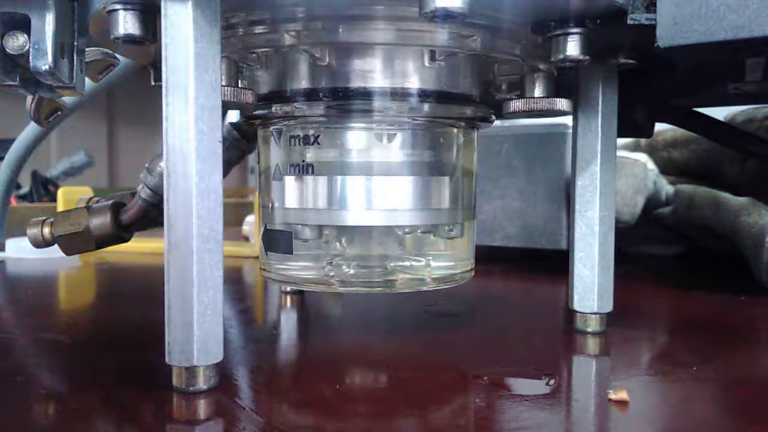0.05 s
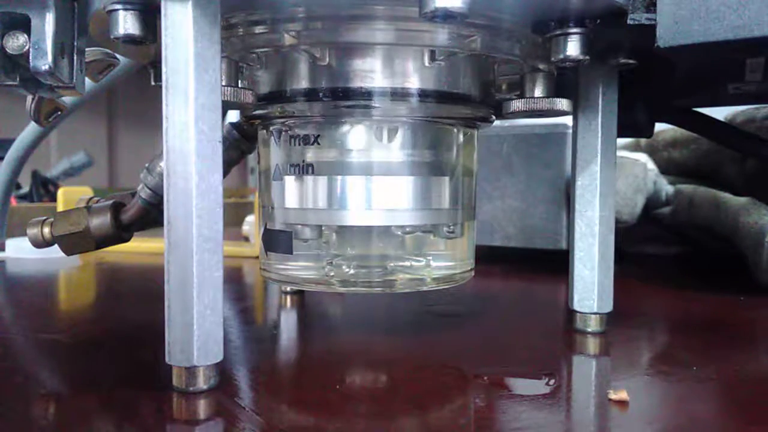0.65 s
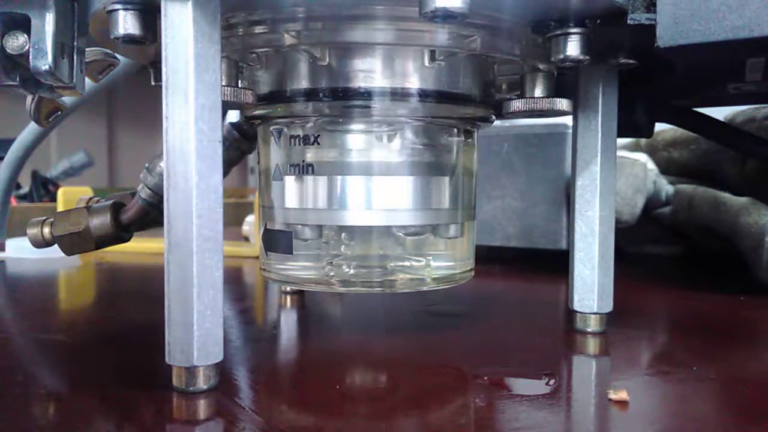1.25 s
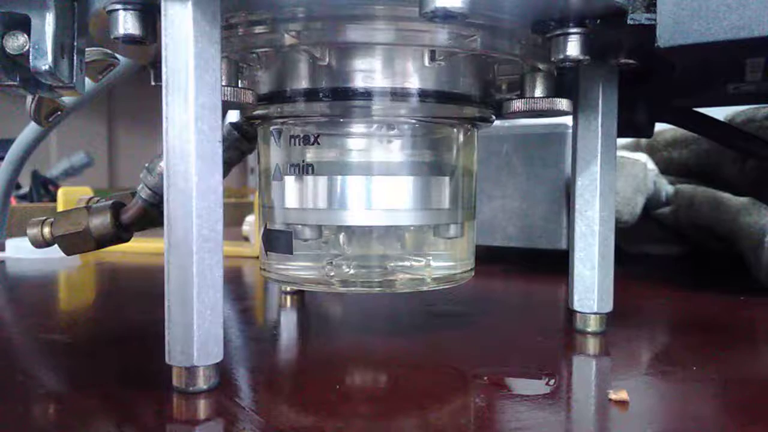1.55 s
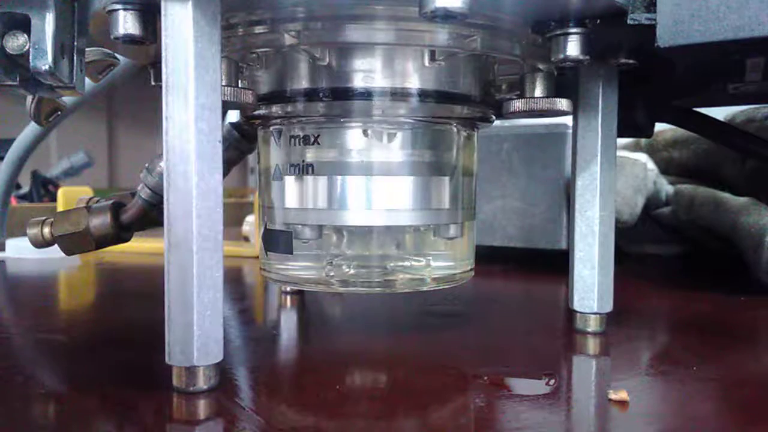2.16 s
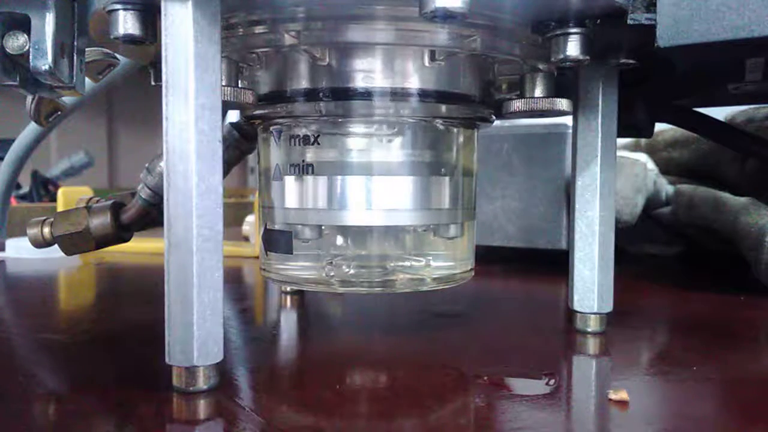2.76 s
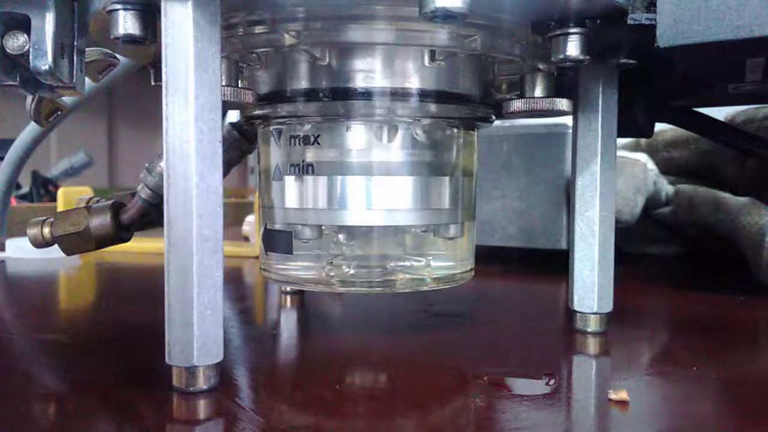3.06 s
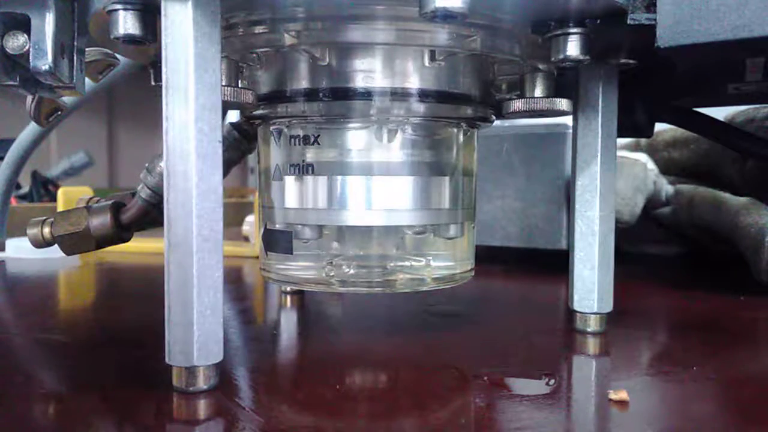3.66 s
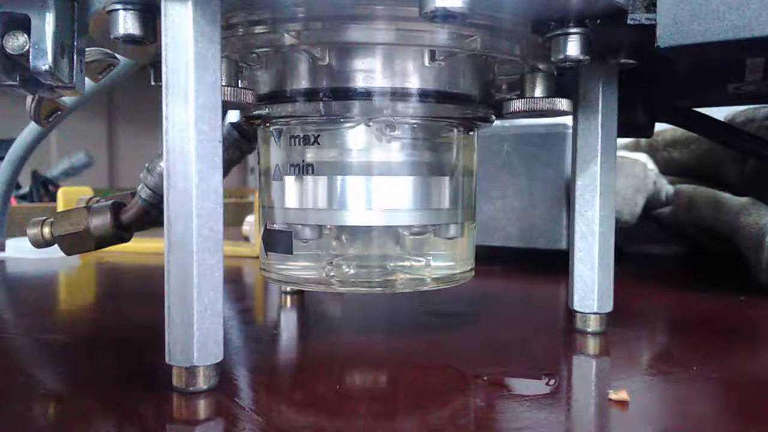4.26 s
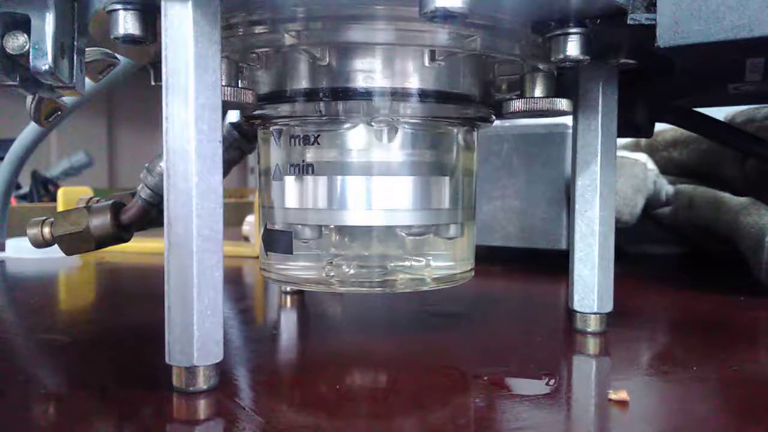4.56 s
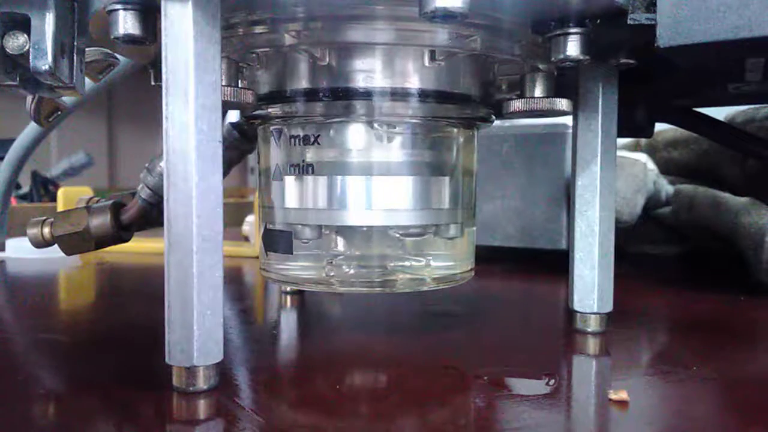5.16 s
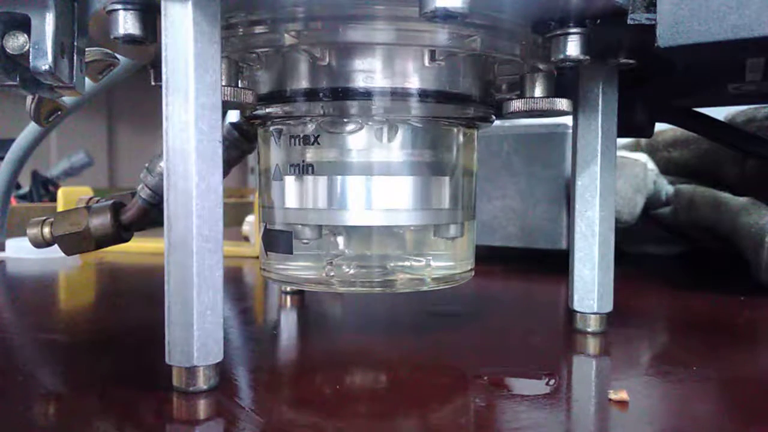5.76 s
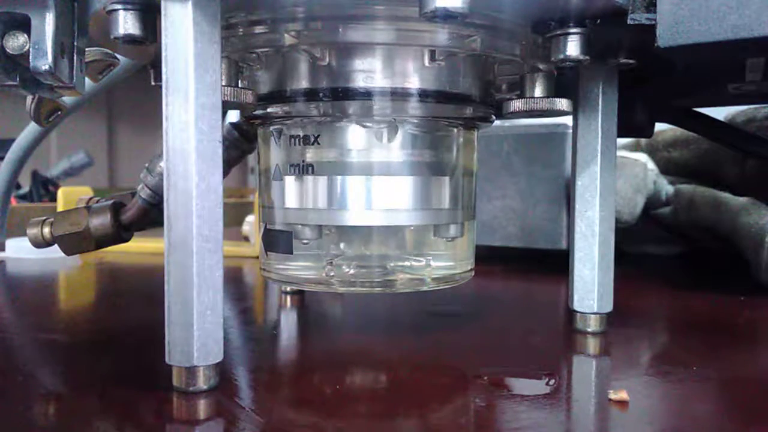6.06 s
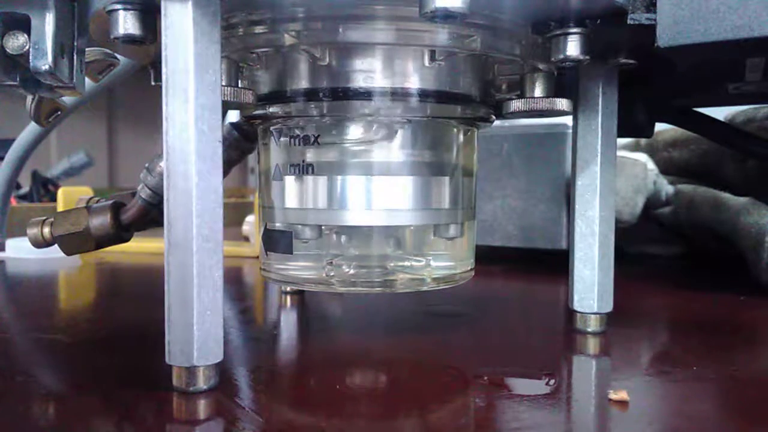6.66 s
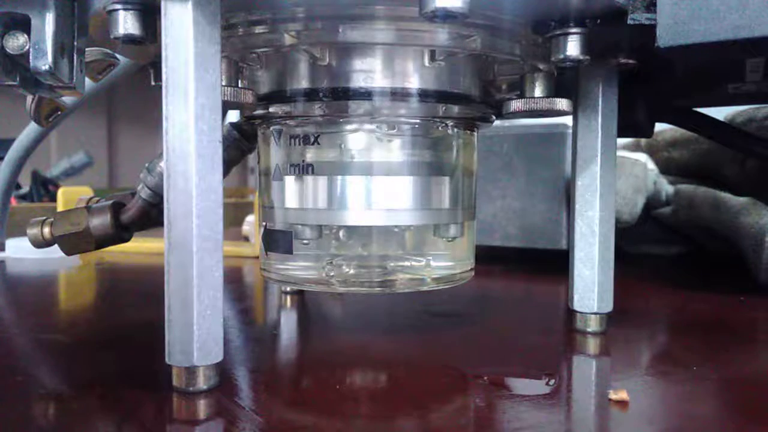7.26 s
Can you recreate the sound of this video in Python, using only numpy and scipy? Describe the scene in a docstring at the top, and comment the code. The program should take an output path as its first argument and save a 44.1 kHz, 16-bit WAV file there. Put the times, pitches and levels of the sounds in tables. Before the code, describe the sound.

High machine whines creep upward in pitch as a pump gathers speed, over a steady low hum and rushing air.

```python
"""A turbomolecular vacuum pump slowly gathers speed on a workshop bench, heard close up in stereo.
From the start, a cooling fan and the mains-driven backing pump hum over a steady rush of air, while the
unbalanced rotor sings one rising tone and its ball bearings add high whines and hiss that climb with it.
Just after 3 s the housing ticks faintly; soon the rotor tone sinks as it leaves the stand's resonances.
Near 6.5 s it crosses the fan's second harmonic, and the throb between the two slows to a halt."""
import sys
import numpy as np
from scipy import signal
from scipy.fft import rfft, irfft
from scipy.io import wavfile

SR = 44100
rng = np.random.default_rng(int(sys.argv[2]) if len(sys.argv) > 2 else 0)


def log_audio(samples):
    """Write samples as a 16-bit WAV file to the path given in sys.argv[1]."""
    # one column per channel
    frames = np.atleast_2d(samples).T
    # limit to full scale, then quantise
    limited = np.clip(frames, -1, 1)
    pcm = np.round(limited * 32767).astype(np.int16)
    wavfile.write(sys.argv[1], SR, pcm)


N = 322812
TIME = np.arange(N) / SR

START_HZ, SPIN_UP_HZ_PER_S = 402.77, 8.378  # steady torque, so the rotor gains speed evenly
UNBALANCE_LEFT_DB, UNBALANCE_RIGHT_DB = -36, -52.5  # rotor tone away from any resonance
BALL_TURNS, BALL_LAG_PER_S = 2.212, .003585  # ball turns per rotor turn, and their loss to slip
CAGE_TURNS = .424  # per rotor turn
FAN_HZ, FAN_SWELL_S = 228.7, 7.015  # blade rate; when its second harmonic swells with the rotor tone
FAN_LAG_S = .0003  # the fan stands to the right, so its rush reaches the left later
VANE_HZ = 47.6  # strokes of the backing pump
TOP_HZ = 14200

# The bed of cooling air. Each row: frequency in Hz, left and right level in dB per Hz.
AIR_SPECTRUM = [(25, -102, -100), (40, -87, -87), (64.6, -93, -75.5), (131, -77.5, -71), (280, -72, -76),
                (370, -75.5, -75.5), (523, -76.5, -77.5), (755, -80, -76), (880, -78, -72),
                (1190, -77, -71), (1185, -79.5, -74.5), (1750, -85, -84)]
# The fan's drone. Each row: multiple of the blade rate, left and right level in dB, left lead in radians.
FAN_HARMONICS = [(1, -51.7, -42.7, -.7), (2, -53, -49, -.5), (3, -64, -58.5, -1.5), (4, -54.4, -47.9, -1.5),
                 (5, -72, -61, -.4), (6, -71, -71, 3)]
# The backing pump's mains hum, motor tones and thin whistles.
# Each row: pitch in Hz, left and right level in dB, left lead in radians.
MAINS_TONES = [(100.1, -58.5, -46.0, -0.12), (200, -61, -56, 0.38), (299, -62, -52, -0.55),
               (405, -57.5, -69, 0.16), (603, -100, -81, -1)]
MOTOR_TONES = [(238.1, -63, -65, -.1), (523.6, -66, -73, .3), (571.3, -64.5, -72, .3),
               (619.1, -67.5, -65.5, 0), (645, -70, -69, 0), (785.6, -65, -58.5, 2.9),
               (809.5, -64.5, -61, 2.3), (833.1, -69.8, -62, -3.1), (857, -69, -66, 0), (862, -63, -62, .3),
               (885.55, -46.3, -48.6, 1.4), (1085.4, -64, -65, 1.8), (1095, -66, -80, .2)]
WHISTLE_TONES = [(7576, -68, -82, 0), (7670, -66, -82, -.4)]
# A faint tick. Each row: start in seconds, level in dB before the housing colours it.
TICK_CUES = [(3.183, -44)]
# The housing's ring. Each row: centre in Hz, width in Hz, gain in dB, seconds to die away by 60 dB.
HOUSING_MODES = [(2950, 700, 3.5, 0.056), (3900, 900, -4, .04)]
# The bearings' rolling hiss. Each row: frequency in Hz, left and right level in dB per Hz.
HISS_SPECTRUM = [(2404, -81.5, -80.5), (3180, -81.5, -83.5), (4570, -85, -88.5), (4700, -88.5, -91),
                 (6400, -93, -91), (7980, -85.5, -91), (9020, -78.5, -90.5), (10160, -84.5, -102),
                 (10730, -81, -96), (12200, -93.5, -89), (12960, -99, -88), (14300, -103, -100)]

# Level rides of the loud whines as they climb through the casing's resonances, named for their middle
# pitch in Hz. Each row: time in seconds, left and right level in dB, left lead in radians.
BALL_2860 = [(0.0, -49, -63.7, 0), (0.1, -57.7, -68.6, 2.6), (0.31, -74.4, -68.9, 4.3),
             (0.41, -61.5, -64.3, 3), (0.58, -68.7, -66.4, 7), (0.68, -60.8, -73.0, 4),
             (0.99, -58.3, -54.6, 4), (1.16, -72.4, -67.6, 6), (1.26, -64.7, -57.9, 4.4),
             (1.39, -67, -51.7, 5), (2.35, -45, -47.5, 1.5), (3.16, -51.7, -44, 0.6), (3.5, -52, -44, 0.6),
             (3.78, -60.7, -46, 1.6), (4.35, -50.1, -45.1, 1.4), (5.03, -51.1, -46.5, 1.3),
             (5.2, -60, -49.3, 1.5), (5.44, -49, -44.5, 1.0), (5.88, -51.9, -47.5, 0),
             (5.99, -60, -46.1, -0.4), (6.22, -50.8, -47, -1.0), (6.39, -49.4, -56.1, -4),
             (6.97, -49.5, -45, -5), (7.32, -52, -53, -5)]
BALL_3810 = [(0.0, -51, -48.5, -1.9), (0.51, -55.9, -49, -2), (1.02, -50, -45.5, -1.9),
             (1.16, -59, -57.1, -2.5), (1.33, -58.9, -51, -2.5), (1.63, -60.5, -55, -5),
             (2.07, -57.2, -54, -3.5), (2.28, -54.6, -49, -8), (3.03, -56.6, -56, -8.2),
             (3.3, -66.9, -63.9, -9), (3.81, -58.2, -59.8, -9.9), (3.95, -71.9, -58, -9),
             (4.05, -59.0, -56.1, -12.5), (4.29, -61, -63, -12.2), (4.46, -73.8, -58.0, -15),
             (4.56, -58.7, -58.5, -12), (4.69, -57.8, -58.1, -14.4), (5.2, -64, -54.1, -17.5),
             (6.19, -53.8, -55.6, -20.5), (6.36, -66, -50, -15), (6.53, -54.7, -57, -19),
             (6.87, -62.2, -49, -18.0), (7.04, -51, -52.2, -17.5), (7.32, -53.6, -51, -19)]
RACE_1120 = [(0, -71, -62, -1.5), (4.2, -70, -64, -1.5), (5.6, -61, -56, -1), (7.3, -61, -57.5, -1)]
RACE_1480 = [(0, -61, -59, -1.8), (1, -65, -58, -1.5), (1.6, -72, -71, -2), (4, -72, -69, -2),
             (4.7, -62, -61, -2), (7.3, -71, -68, -2)]
RACE_1900 = [(0, -70, -66, -3), (1, -66, -59, -2.5), (2.4, -63, -56, -2.5), (3.1, -73, -70, -3),
             (4, -74, -68, -3), (4.6, -64, -62, -3), (7.3, -62, -56, -3)]
RACE_2350 = [(0.0, -64.1, -53, 1.9), (0.88, -67.1, -50, 2.0), (1.63, -56, -57, 1.7),
             (2.01, -60.4, -50.8, 1.5), (2.38, -53, -53, 2.5), (3.27, -61, -60, 1.9),
             (3.84, -51.5, -62, 1.4), (4.25, -54.6, -69, 3.2), (5.44, -61, -51.5, 5.2),
             (6.19, -53.1, -54, 5.8), (6.53, -55.9, -55.9, 5.2), (7.32, -53.5, -51, 4.8)]
RACE_2830 = [(0.0, -55, -51.5, 2.7), (1.38, -66, -56, -3.5), (2.22, -61.8, -57, 0.5),
             (3.06, -62.4, -65.5, 1), (3.55, -57, -59, 1), (3.75, -68, -69, 0), (5.03, -57, -61, 1),
             (6.66, -58, -62, -4), (7.3, -56, -57, 1.5)]
RACE_3150 = [(0.0, -62.0, -64.6, 0.9), (0.65, -74.2, -69.5, -1), (1.12, -57.1, -58.7, 0.2),
             (1.7, -54, -64.6, 1), (2.76, -52.5, -56.0, -1.7), (3.47, -59.2, -56, -2.5),
             (3.67, -68.2, -68.4, -1.7), (4.15, -73.1, -61.3, -2), (5.61, -68.2, -61.8, -1.9),
             (6.05, -66, -66.2, -3.8), (6.43, -67.2, -69.1, -2), (6.7, -71.7, -65.5, 0),
             (7.32, -65.6, -68.5, -7)]
RACE_3400 = [(0.0, -46, -45, -0.5), (0.24, -46.3, -51, -2), (0.58, -53.1, -50, -1.0), (0.78, -45, -48, 0.9),
             (0.95, -46, -55, -2), (1.22, -56, -46.5, -1.8), (1.56, -50, -49.5, 0.8), (1.9, -51, -48, -3),
             (2.07, -52.4, -47, -1), (2.35, -46, -46.5, -0.6), (2.59, -50.1, -43.5, -1.5),
             (3.06, -47, -44.5, 0.5), (3.3, -49, -49, -1.5), (3.61, -54.4, -45.5, -0.6),
             (4.08, -51, -48.5, 1), (4.73, -48, -48.5, -1.5), (5.07, -60, -47.5, -2),
             (5.37, -48, -53, -0.5), (5.61, -44, -51.9, -2.4), (5.85, -58, -46, -2),
             (6.12, -47.3, -49.2, -1.3), (6.43, -51.6, -49.0, -0.9), (7.21, -51, -54.6, -2.0),
             (7.32, -54.0, -55.5, -2)]
RACE_4260 = [(0.0, -57.8, -68.4, -0.7), (0.41, -58, -56, 2.5), (0.68, -48, -58, -1.5),
             (0.88, -61.7, -51, -2.9), (1.36, -55.0, -59, -5.5), (1.87, -61.8, -53, -6.4),
             (2.07, -56.1, -58.7, -6.0), (2.24, -63.8, -55, -5.2), (2.65, -60, -62, -0.5),
             (2.89, -51, -59, -1), (3.16, -61, -52, -1.5), (3.78, -58, -56, -1), (4.12, -68, -50.5, -4),
             (4.42, -52, -53, -5), (5.03, -63.4, -48.5, -4), (5.41, -52, -49.1, -4.7),
             (6.29, -57, -55, -5.5), (6.67, -66.3, -62, -6.2), (6.73, -68.1, -58, -3.9),
             (7.32, -63.3, -57.4, -7)]
RACE_6180 = [(0, -77, -68, .8), (3.3, -71, -66, .8), (5, -63, -63.5, 1), (7.3, -66, -60, .8)]
RACE_11050 = [(0.0, -62, -67.8, -2.1), (0.48, -50.3, -65.5, -1.5), (0.85, -52, -70.8, -1.5),
              (1.43, -54, -60.6, -2.5), (1.87, -52.1, -66.9, -4), (2.69, -57.7, -61.7, -1),
              (3.16, -49, -61.7, -2), (3.47, -55, -64.6, -2), (4.08, -52, -55, -1.1),
              (4.76, -49, -60.7, -1), (4.93, -51.5, -68.8, 2), (5.27, -52, -68.6, -3),
              (5.58, -49.6, -58, -1.4), (5.88, -51, -69.2, -1.6), (6.09, -49, -64.6, -3.5),
              (6.53, -57.7, -57, -1.5), (6.84, -52, -73.3, -2.7), (7.32, -63.9, -56.0, 1)]
RACE_12950 = [(0.0, -59.2, -61, -1), (0.78, -66.8, -47, -2), (1.8, -62.7, -53, 1.5),
              (2.01, -59.1, -50.9, -0.7), (2.65, -62.2, -54.1, -0.8), (2.99, -57, -49, -1.3),
              (3.74, -66.1, -49.4, -1.9), (3.91, -61.4, -54.5, -2.5), (4.18, -71.1, -57.3, -2),
              (4.52, -65.0, -58, -5.8), (4.73, -73.3, -55.1, -4), (4.93, -62.8, -59, -7.8),
              (5.58, -69.2, -53.2, -8.7), (6.84, -61.9, -56, -6), (7.14, -71.7, -56.2, -9),
              (7.32, -66.6, -58.5, -6.7)]
# Loud ball whines. Each row: multiple of the ball spin, level ride.
BALL_LOUD = [(3, BALL_2860), (4, BALL_3810)]
# Faint ball whines. Each row: multiple of the spin, left and right level in dB, left lead in radians.
BALL_FAINT = [(2, -66, -63, 3.5), (5, -64, -67, -2.5), (7, -62.5, -68, 2), (8, -82, -76, 0),
              (9, -72, -95, -5.5), (10, -64, -79, 0)]
# Loud raceway whines, each throbbing against a close twin from the other bearing.
# Each row: multiple of the rotor speed, cage gaps up to the twin, time of one swell in seconds,
# the twin's relative level in dB, how far it follows the load from 0 to 1, level ride.
RACE_LOUD = [(2.57, 1, .058, -12, 0, RACE_1120), (3.423, 1, .058, -9, 0, RACE_1480),
             (4.423, 1, .058, -7, 0, RACE_1900), (5.424, 1, .058, -5, 0, RACE_2350),
             (6.521, 2, .104, -2, 0, RACE_2830), (7.275, -3, .097, -11, 0, RACE_3150),
             (7.834, 2, .104, 0, 1, RACE_3400), (9.834, 2, .076, -15, 0, RACE_4260),
             (14.25, 3, 0, -12, 0, RACE_6180), (25.5, 1, .25, -14, 0, RACE_11050),
             (29.914, 1, 0, -20, 0, RACE_12950)]
# Faint rotor, raceway and cage whines.
# Each row: multiple of the rotor speed, left and right level in dB, left lead in radians.
RACE_FAINT = [(3, -74, -73, -2.3), (3.81, -73, -71, -1), (4, -80, -71, -3.1), (5.168, -75, -67, 2.1),
              (6.355, -78, -70, 0.3), (6.423, -71, -67, 0.3), (6.905, -68, -70, -2.6),
              (7.75, -71, -71, -1.8), (8.841, -66, -68, -1.5), (9.964, -71, -67, -3.0),
              (9.991, -72, -67, 2.0), (10.33, -76, -75, 0), (10.7, -73, -69, 0.4), (13.8, -76, -76, 0),
              (16.664, -74, -72, 2.2), (17.586, -73, -71, -0.7), (20.291, -73, -73, -2.6),
              (21.914, -67, -76, -1.8), (23.109, -70, -76, -3.1), (24.095, -69, -83, 1.8),
              (27.241, -74, -71, -0.9), (27.5, -69, -64, -2.9), (27.918, -77, -70, -2.9),
              (30.618, -75, -66, -1.5), (30.705, -81, -71, -1.2), (30.959, -78, -72, 2.9),
              (31.355, -77, -68, -0.5), (31.909, -78, -71, 0.1), (34.345, -71, -63, -1.0)]
# The two cages' rates, slowly drawing together. Each row: time in seconds, gap between them in Hz.
CAGE_GAP = [(0, 2.98), (.5, 3.02), (3.25, 3.05), (4.5, 2.8), (5.45, 2.63), (6.35, 2.9), (7.3, 2.6)]
# The second bearing's shifting share of the load, which makes the throb come and go.
# Each row: time in seconds, the twin's left and right gain in dB.
TWIN_LOAD = [(0, -3, -2.5), (1.1, -6, -4.5), (1.8, -4, -2), (2.3, -13, -10), (3.1, -10, -9), (4, -1, -2.5),
             (4.9, -3, -.5), (5.7, -9, -8), (6.6, -7, -11), (7.3, -2, -8)]
# Resonances of the pump on its legs. Each row: centre in Hz, width in Hz, left and right lift in dB.
STAND_MODES = [(407.3, 20.4, 2.5, 10.5), (420.3, 17.6, 4.5, 7.5), (433.5, 16, 2, 10.5)]


def undb(db):
    """Decibels to gain."""
    return 10 ** (np.asarray(db) / 20)


def curves(table):
    """One automation curve for each column after a table's time column."""
    times, *columns = np.transpose(table)
    return [np.interp(TIME, times, column) for column in columns]


def walk(rate):
    """Smooth random drift with a spread of 1, changing about rate times a second."""
    knots = rng.standard_normal(int(N / SR * rate) + 2)
    fine = signal.resample_poly(knots, up=8, down=1)
    return np.interp(TIME * rate * 8, np.arange(len(fine)), fine)


def angle(hz):
    """Running angle of something that turns hz times a second, from a random start."""
    return rng.uniform(0, 2 * np.pi) + 2 * np.pi * np.cumsum(hz * np.ones(N)) / SR


def tone(phase, left_db, right_db, lead):
    """One stereo partial at RMS levels, the left side ahead by lead radians."""
    phase = np.mod(phase, 2 * np.pi).astype(np.float32)
    left = undb(left_db) * np.sin(phase + np.float32(lead))
    right = undb(right_db) * np.sin(phase)
    return np.array([left, right]) * np.sqrt(2)


def stereo_noise(likeness):
    """White noise, wide at likeness 0 and mono at 1."""
    shared = np.sqrt(likeness) * rng.standard_normal(N)
    return shared + np.sqrt(1 - likeness) * rng.standard_normal((2, N))


def colour(noise, spectrum, skirt_db):
    """EQ each side of a noise, rolling off by skirt_db an octave beyond the spectrum's ends."""
    hz, *sides = np.transpose(spectrum)
    octave, points = np.log2(np.maximum(np.fft.rfftfreq(N, 1 / SR), 1)), np.log2(hz)
    outside = np.abs(octave - np.clip(octave, points[0], points[-1]))
    db = np.array([np.interp(octave, points, side) for side in sides]) - skirt_db * outside
    return irfft(rfft(noise) * undb(db), N) * np.sqrt(SR / 2)


def air_rush():
    """The fan pushes an even bed of air, much alike on both sides but later on the left."""
    rush = colour(stereo_noise(likeness=0.57), AIR_SPECTRUM, skirt_db=23.0)
    left, right = rush * undb(0.45 * walk(rate=8))
    return np.array([np.roll(left, round(FAN_LAG_S * SR)), right])


def fan_blades(rotor_angle, waver_db=0.4):
    """The blades drone on harmonics of one steady rate; the second throbs against the rotor tone."""
    swell_angle = np.interp(FAN_SWELL_S, TIME, rotor_angle) / 2
    blade_angle = 2 * np.pi * FAN_HZ * (TIME - FAN_SWELL_S) + swell_angle
    out = np.zeros((2, N))
    for multiple, left_db, right_db, lead in FAN_HARMONICS:
        waver = waver_db * walk(rate=6.3)
        out += tone(multiple * blade_angle, left_db + waver, right_db + waver, lead)
    return out


def backing_tones(partials, waver_db, drift_rad):
    """The backing pump runs at one speed, so its tones only waver a little in level and phase."""
    out = np.zeros((2, N))
    for hz, left_db, right_db, lead in partials:
        waver = waver_db * walk(rate=6.3)
        phase = angle(hz) + drift_rad * walk(rate=2.9924)
        out += tone(phase, left_db + waver, right_db + waver, lead)
    return out


def vane_wheeze():
    """The backing pump's vanes wheeze through a narrow resonance, twice in each stroke."""
    band = signal.butter(2, [7540, 7710], "bandpass", fs=SR, output="sos")
    ring = signal.sosfilt(band, stereo_noise(likeness=.5))
    pulsing = undb(2.8 * np.sin(2 * np.pi * 2 * VANE_HZ * TIME))
    return ring / ring.std() * pulsing * undb([[-60], [-74]])  # well to the left


def housing_tick():
    """A light knock rings the damped resonances of the housing."""
    out = np.zeros((2, N))
    for start, level_db in TICK_CUES:
        age = np.maximum(TIME - start, 0)
        for hz, width, gain_db, t60 in HOUSING_MODES:
            band = signal.butter(2, [hz - width / 2, hz + width / 2], "bandpass", fs=SR, output="sos")
            burst = stereo_noise(likeness=0.58) * (age > 0) * np.exp(-np.log(1000) * age / t60)
            out += signal.sosfilt(band, burst) * np.sqrt(SR / 2 / width) * undb(level_db + gain_db)
    return out


def rolling_hiss(rotor_hz, repeat=0.11):
    """The balls meet the same roughness each cage turn, so a faint comb in the hiss climbs with speed."""
    fresh = stereo_noise(likeness=0.056)
    # the same noise one cage turn ago, read from a four times finer grid
    finer = signal.resample_poly(fresh, up=4, down=1, axis=1)
    earlier = (np.arange(N) - SR / (CAGE_TURNS * rotor_hz)) * 4
    echo = np.array([np.interp(earlier, np.arange(len(side)), side) for side in finer])
    roughness = (fresh + repeat * echo) / np.sqrt(1 + repeat ** 2)
    flicker = undb(.5 * walk(rate=25) + .5 * walk(rate=120))
    shake = undb(np.sin(2 * np.pi * VANE_HZ * TIME))  # each backing pump stroke shakes the bearings
    return colour(roughness, HISS_SPECTRUM, skirt_db=17.5) * flicker * shake


def whine(hz, left_db, right_db, lead, slip_rad, flutter_db, fade_db, scatter_rad, bend_rad=0):
    """One bearing tone: the balls slip and flutter, and reflections fade each side on its own."""
    phase = angle(hz) + bend_rad + slip_rad * (walk(rate=4) + 0.5 * walk(rate=40))
    swell_db = flutter_db * walk(rate=30)
    left_db, right_db = (db + swell_db + fade_db * walk(rate=5) for db in (left_db, right_db))
    return tone(phase, left_db, right_db, lead + scatter_rad * walk(rate=2.05))


def ball_whines(rotor_hz):
    """Slightly unround balls sing harmonics of their spin, which lags as the rotor speeds up."""
    spin_hz = rotor_hz * (BALL_TURNS - BALL_LAG_PER_S * TIME)
    out = np.zeros((2, N))
    for multiple, ride in BALL_LOUD:
        out += whine(multiple * spin_hz, *curves(ride),
                     slip_rad=0.25, flutter_db=1.35, fade_db=0.36, scatter_rad=0.086)
    for multiple, left_db, right_db, lead in BALL_FAINT:
        out += whine(multiple * spin_hz, left_db, right_db, lead,
                     slip_rad=0.84, flutter_db=3.5, fade_db=2.5, scatter_rad=1.24)
    return out


def raceway_whines(rotor_hz):
    """Wavy races sing at uneven multiples of the rotor speed; the two bearings beat together."""
    out = np.zeros((2, N))
    load_db = np.array(curves(TWIN_LOAD))
    gap_angle = angle(*curves(CAGE_GAP))
    for multiple, gaps, swell_s, twin_db, follows_load, ride in RACE_LOUD:
        left_db, right_db, lead = curves(ride)
        twin_gain = undb(twin_db + follows_load * load_db)
        twin_angle = gaps * (gap_angle - np.interp(swell_s, TIME, gap_angle))
        # a whine and its twin add up to one tone that throbs in level and bends in phase
        beat = (1 + twin_gain * np.exp(1j * twin_angle)) / np.hypot(1, twin_gain)
        left_throb_db, right_throb_db = 20 * np.log10(np.abs(beat))
        left_bend, right_bend = np.angle(beat)
        out += whine(multiple * rotor_hz, left_db + left_throb_db, right_db + right_throb_db,
                     lead + left_bend - right_bend, bend_rad=right_bend,
                     slip_rad=0.12, flutter_db=1.45, fade_db=0.47, scatter_rad=0.1)
    for multiple, left_db, right_db, lead in RACE_FAINT:
        out += whine(multiple * rotor_hz, left_db, right_db, lead,
                     slip_rad=0.26, flutter_db=4.5, fade_db=3.0, scatter_rad=0.72)
    return out


def rotor_tone(rotor_hz, rotor_angle):
    """The unbalance shakes the pump once a turn: a clean lead tone, lifted by the stand's resonances."""
    left_db, right_db = UNBALANCE_LEFT_DB, UNBALANCE_RIGHT_DB
    for centre, width, left_lift_db, right_lift_db in STAND_MODES:
        bell = 1 / (1 + (2 * (rotor_hz - centre) / width) ** 2)
        left_db += left_lift_db * bell
        right_db += right_lift_db * bell
    return tone(rotor_angle, left_db, right_db, lead=-.27)


def scene():
    """The mix: the rotor's rising speed drives the whines and hiss over a steady bed of hum and air."""
    rotor_hz = START_HZ + SPIN_UP_HZ_PER_S * TIME
    rotor_angle = angle(rotor_hz)
    bearings = ball_whines(rotor_hz) + raceway_whines(rotor_hz) + rolling_hiss(rotor_hz)
    tick = housing_tick()
    mains = backing_tones(MAINS_TONES, waver_db=0.5, drift_rad=.05)
    motor = backing_tones(MOTOR_TONES, waver_db=0.5, drift_rad=0.078)
    wheeze = vane_wheeze() + backing_tones(WHISTLE_TONES, waver_db=3.5, drift_rad=2.1)
    fan = fan_blades(rotor_angle) + air_rush()
    return fan + mains + motor + wheeze + tick + bearings + rotor_tone(rotor_hz, rotor_angle)


def record(dry):
    """A steep high cut takes off the very top."""
    return signal.sosfilt(signal.ellip(10, .2, 80, TOP_HZ, fs=SR, output="sos"), dry)


dry = scene()
out = record(dry)
log_audio(out)
```